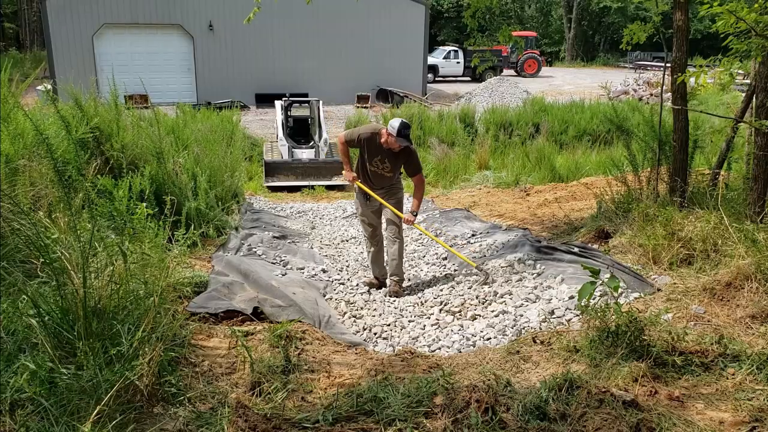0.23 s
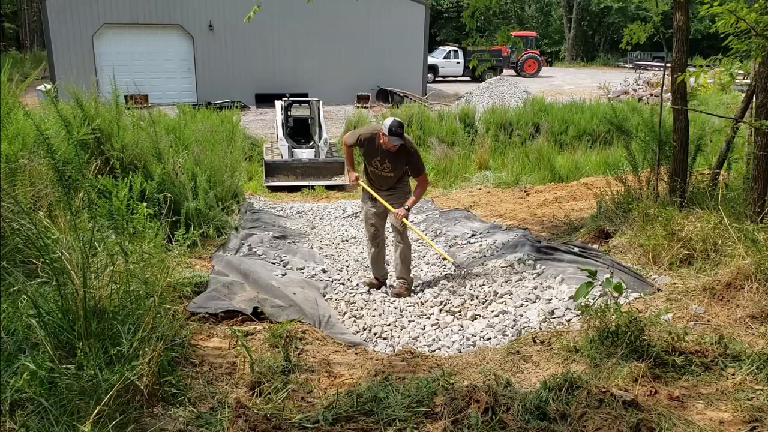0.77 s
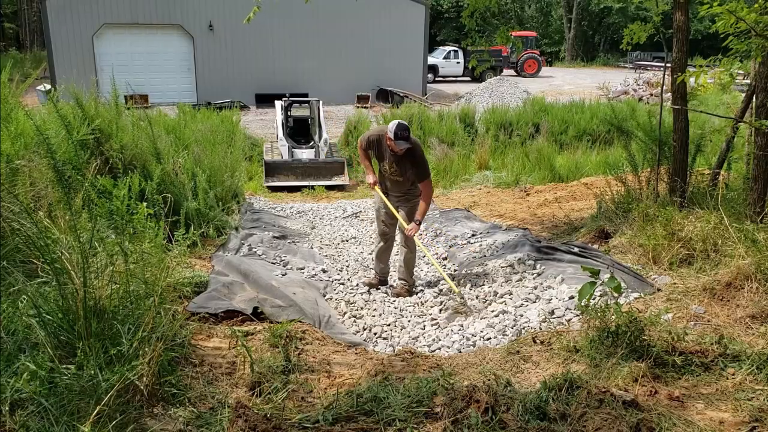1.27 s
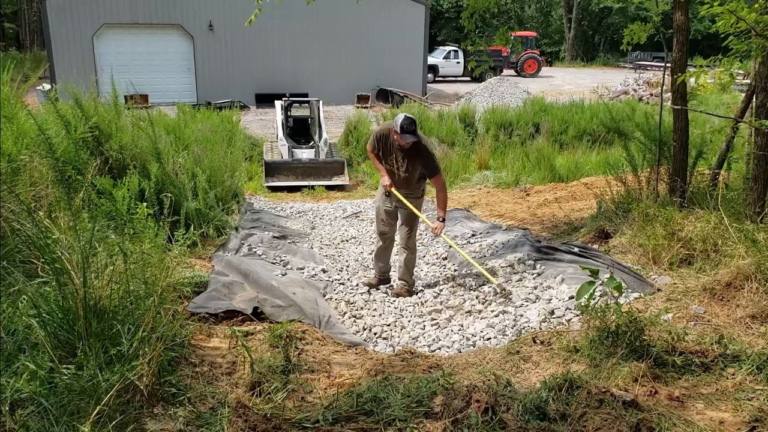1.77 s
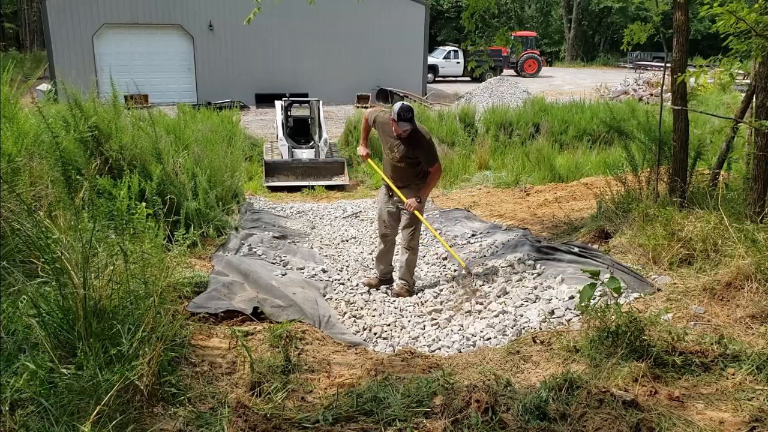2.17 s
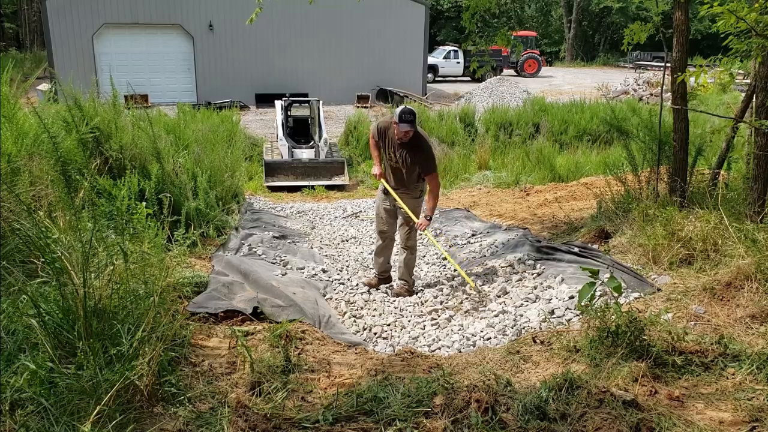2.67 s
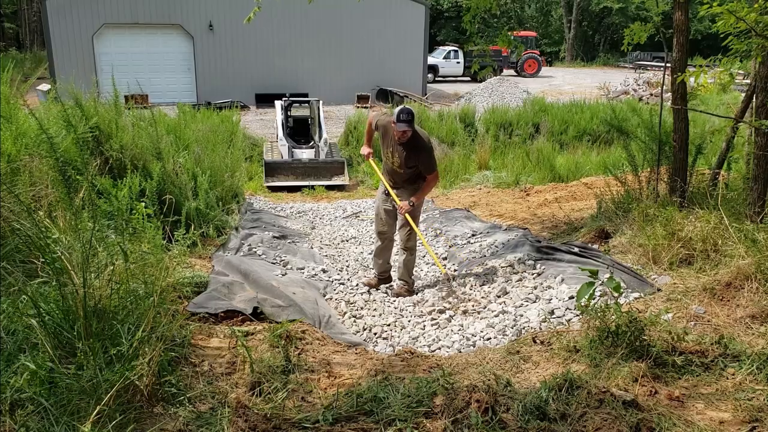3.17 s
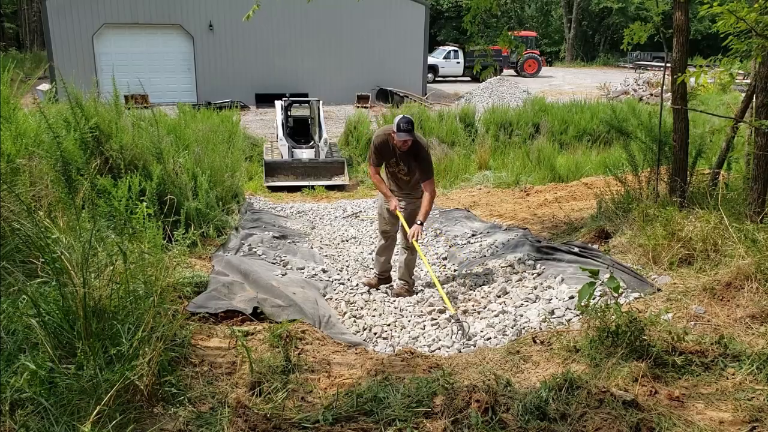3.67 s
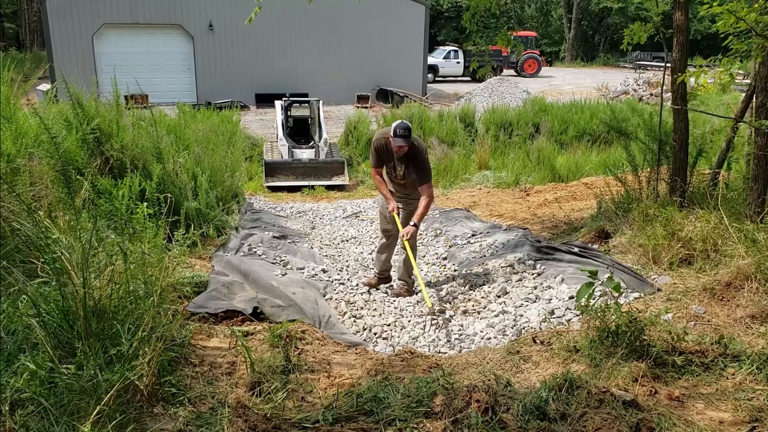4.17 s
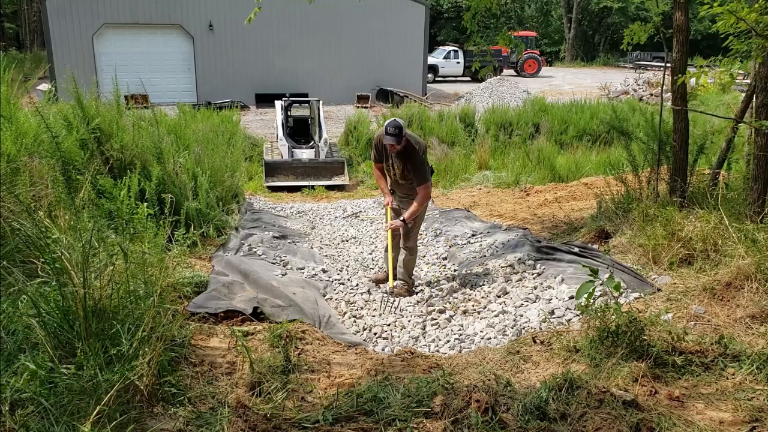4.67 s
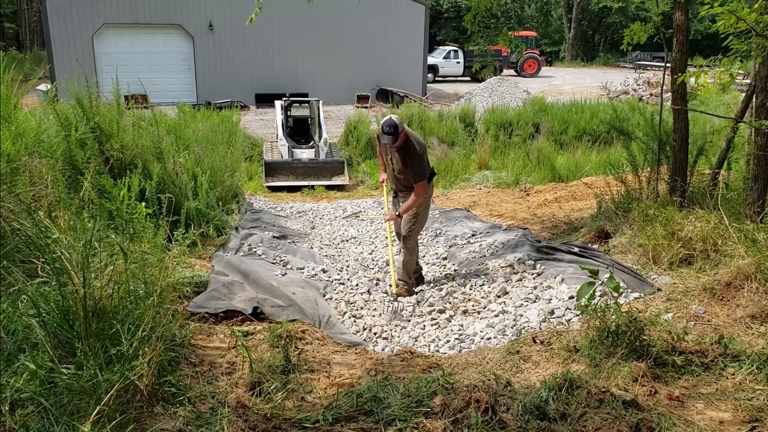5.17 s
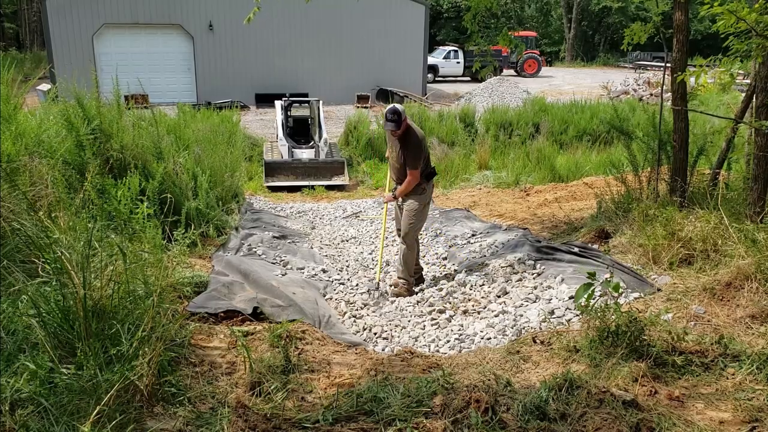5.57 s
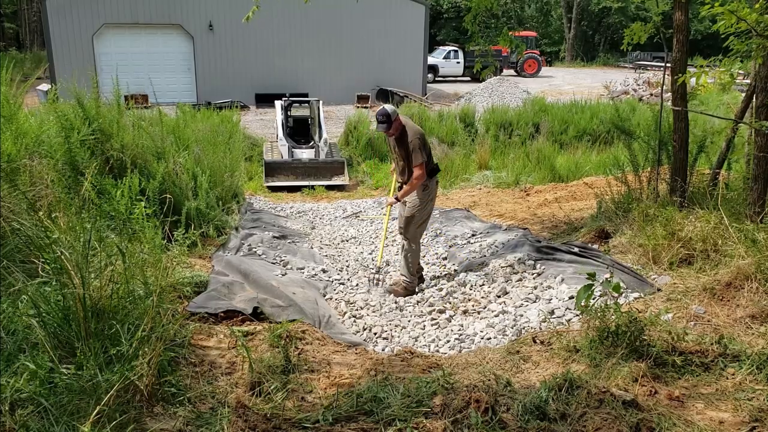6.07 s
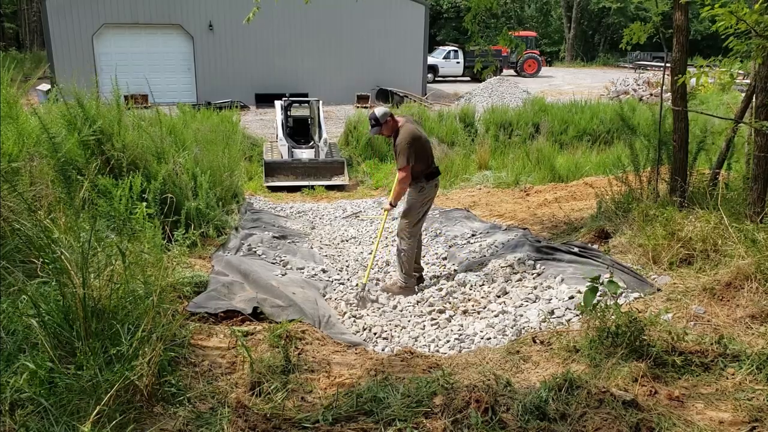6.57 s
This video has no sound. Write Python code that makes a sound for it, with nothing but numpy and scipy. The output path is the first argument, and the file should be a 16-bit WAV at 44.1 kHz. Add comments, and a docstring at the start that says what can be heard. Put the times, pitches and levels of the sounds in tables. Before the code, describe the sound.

A steel rake works coarse loose stones in an open yard, heard in stereo from several metres away. Thin insect hiss, quiet air and low breeze bumps on the microphone run throughout. Two tiny stone clicks come at 0.1 s, then a short scrape at 0.2 s with scattered clinks until 0.8. Longer gritty drags start at about 1.2, 1.8 and 2.7 s, tines skidding and ringing, stones clattering and tumbling afterwards; one sharp clack stands out near 2.5. The head chops into the heap at 3.7, 4.1 and 4.5 s: bright crunches with dull thuds, and small scrapes between. A far bird trills in rapid falling notes from 4.3 to 5.1, growing slightly. Grinding pulls resume from 5.1 to 5.7, brighter and closely spaced, then sparse clicks and shorter scrapes around 6.4 and 6.6. Trees and a shed scatter short diffuse echoes.

```python
"""Two stone clicks over insect hiss and breeze; then a steel rake is pulled through coarse loose stones. Tines
skid and ring (noisy contacts through steel modes); the bed grinds (colliding grains of damped sines). Stones
tumble during and after pulls (damped clicks); three times the head chops into the heap (noise bursts). Noise
tails scatter the sound back as from trees and a shed; a far bird trills in falling sines. Shaped noise makes
the air, the insects, the breeze that nudges the microphone and low thumps of the rake on the ground."""
import sys
import numpy as np
from scipy import signal
from scipy.fft import rfft, irfft, next_fast_len
from scipy.io import wavfile
from scipy.ndimage import map_coordinates

SR = 44100
rng = np.random.default_rng(int(sys.argv[2]) if len(sys.argv) > 2 else 0)


def inscribe(sig):
    """Save sig as 16-bit PCM at rate SR to the path in sys.argv[1].

    A 1-D sig is mono; a 2-D sig holds one channel per row.
    Samples are clipped to [-1, 1] before scaling.
    """
    pcm = np.round(np.clip(np.atleast_2d(sig).T, -1, 1) * 32767)
    wavfile.write(sys.argv[1], SR, pcm.astype(np.int16))


N = 300321

# Background air, relative density: f/Hz, level/dB
AIR_SPECTRUM = [(60, -11.5), (120, -11.5), (250, -15), (500, -18), (1000, -27.5), (2000, -28.5),
                (4000, -28.5), (8500, -38), (10000, -26.5), (11000, -27), (16000, -33)]
# Insect chorus, relative density: f/Hz, level/dB
INSECT_SPECTRUM = [(3000, -25), (4800, -7.5), (5700, -1.5), (6500, -0.5), (7500, -4.5), (8500, -21),
                   (12000, -22.5)]
# Breeze on the microphone, relative density: f/Hz, level/dB
BUFFET_SPECTRUM = [(15, -31.5), (30, -8.5), (45, -5), (60, -0.5), (90, -5), (130, -10.5), (200, -21.5),
                   (300, -34), (600, -68)]
# Low puffs of breeze and thumps of the rake on the ground, before the microphone's low cut: middle t/s, 1/e
# half-width t/s, level/dB
PUFFS = [(0.284, .05, -46), (.41, 0.094, -48.5), (0.579, 0.031, -46.5), (0.915, 0.04, -52.5),
         (1.203, .09, -49.5), (1.373, 0.011, -34.5), (1.854, 0.025, -40), (2.0, 0.13, -57.5),
         (2.284, .025, -59), (2.72, .025, -51), (3.732, 0.016, -41), (3.82, .08, -55.5),
         (4.077, 0.022, -53), (4.515, 0.013, -40.5), (4.598, 0.017, -45), (4.708, 0.049, -41),
         (5.24, 0.095, -50), (6.3, .06, -61)]
# Decay of the late scatter: f/Hz, t60/s
YARD_T60 = [(200, 1), (800, 0.53), (2500, 0.46), (6000, 0.39), (15000, 0.37)]
# Colour of the foliage's scatter: f/Hz, relative level/dB
SCATTER_SPECTRUM = [(200, -11), (900, -6.5), (1500, -7.5), (2500, -4.5), (5000, -1), (9000, 2), (12500, -1),
                    (16000, -5.5)]
# Rake comes in from the right towards the middle: t/s, lateness of the left port/samples
LEFT_LAG = [(0, 3.3), (2, 3.1), (3.7, 3.4), (4.1, 2.38), (4.5, 0.94), (6.8, 0.32)]
# Placed knocks of stone on stone, loud and faint: t/s, relative level/dB, f/Hz
STONES = [(0.074, -37.5, 3850), (0.096, -30.5, 3080), (0.505, -23.5, 3230), (0.549, -22.5, 4600),
          (0.652, -29.5, 4470), (0.699, -30.5, 4100), (0.715, -32, 2950), (0.773, -24, 4200),
          (1.517, -25.5, 1890), (1.527, -24, 2200), (1.561, -23, 3030), (1.656, -39, 2350),
          (2.097, -19.5, 2554), (2.147, -19.5, 2666), (2.34, -24.5, 3000), (2.351, -19.5, 3256),
          (2.384, -29.5, 2840), (2.413, -29, 3970), (2.422, -17, 4090), (2.452, -19, 4490),
          (2.463, -7, 4290), (2.928, -26, 2360), (2.977, -23.5, 2370), (3.012, -27, 2300),
          (3.036, -18.5, 3670), (3.055, -21.5, 2600), (3.115, -24.5, 3300), (3.13, -23.5, 2920),
          (3.156, -16.5, 4650), (3.169, -18.5, 3400), (3.208, -21.5, 3470), (3.275, -21.5, 3730),
          (3.317, -30, 3100), (3.451, -42, 6000), (5.406, -14.5, 7840), (5.81, -26, 3540),
          (5.87, -26, 3900), (5.91, -22.5, 4300), (5.994, -35, 3560), (6.046, -32.5, 6280),
          (6.118, -30, 2630), (6.259, -35, 4460), (6.305, -28, 5000), (6.328, -37, 3220),
          (6.346, -39, 2930), (6.573, -22, 4930), (6.659, -23.5, 4940), (6.767, -17.5, 4850)]
# Head touches or bites into the heap: t/s, attack time constant t/s, relative crunch level/dB,
# relative thud level/dB, crunch t60/s, knock f/Hz, after-ring f/Hz
CHOPS = [(3.708, .0003, -29.5, -55, .03, 1300, 2420), (3.714, .0003, -15.5, -25.5, 0.17, 1316, 2360),
         (4.076, .0003, -34, -58, 0.039, 950, 2430), (4.087, 0.00043, -25, -45, 0.072, 1100, 2410),
         (4.0945, .0003, -23.5, -39.5, .13, 965, 2490), (4.4916, 0.0014, -25.5, -36, 0.18, 502, 2800)]
# Crunch of the heap, relative density: f/Hz, level/dB
HEAP_SPECTRUM = [(290, -50), (500, -5), (919, -5), (1080, -20), (1230, -9.5), (2010, 0.5), (2360, -5),
                 (2540, 2), (2770, 4.5), (6140, 4), (7210, 4.5), (14200, 5), (15100, 8.5), (16000, -20)]
# Thud of the struck heap: f/Hz, relative level/dB
THUD_SPECTRUM = [(100, -4), (200, -10.5), (270, -9.5), (380, -11.5), (500, -10.5), (650, -12.5), (900, 0.5),
                 (1080, -7), (1300, -4), (1700, -8), (3000, -11), (8000, -58)]
# Tine catches and slips off, or a stone ticks against a tine: t/s, head skid time constant t/s,
# relative head level/dB, head f/Hz, relative tine level/dB, tine f/Hz
CATCHES = [(0.211, .004, -24.5, 3000, -36.5, 11000), (0.2688, 0.0068, -23, 3230, -36.5, 11000),
           (0.4211, 0.0023, -32.5, 2820, -39, 11080), (1.168, 0.0068, -24.5, 2670, -34, 10500),
           (1.1842, 0.0029, -16.5, 1370, -41, 11000), (1.198, 0.0042, -23, 1460, -30.5, 10600),
           (1.2228, 0.0041, -21, 1608, -40, 15640), (1.239, 0.0029, -17.5, 1600, -40.5, 7800),
           (1.2729, .003, -14, 1690, -31, 11000), (1.3697, 0.0037, -28, 1540, -33, 11000),
           (1.391, 0.0025, -22, 1660, -52, 11200), (1.4367, 0.0021, -22, 1480, -44.5, 7850),
           (1.4556, 0.0024, -24.5, 1670, -42.5, 7800), (1.8238, 0.0018, -32.5, 3460, -33.5, 8170),
           (1.838, 0.0032, -15, 2270, -34.5, 8170), (1.881, 0.0028, -15, 2200, -37.5, 7700),
           (1.8977, 0.0052, -19, 2220, -43, 7780), (1.9223, .0045, -12, 2760, -27, 7400),
           (1.9667, 0.0025, -20, 2190, -55, 7290), (2.001, 0.0052, -14.5, 2400, -27.5, 8900),
           (2.0254, 0.0018, -17, 2970, -47, 11300), (2.0734, 0.0026, -27, 3040, -32.5, 10800),
           (2.086, 0.0034, -15.5, 3105, -37, 11100), (2.166, 0.0036, -17.5, 2640, -40, 7840),
           (2.2174, 0.0021, -24, 3440, -66, 8360), (2.353, 0.00088, -47, 2000, -48.5, 12420),
           (2.6977, 0.0029, -16, 2260, -26.5, 11200), (2.7291, 0.0023, -16, 2370, -34.5, 10050),
           (2.7631, .004, -14.5, 2920, -27.5, 13000), (2.7757, 0.0036, -19, 2300, -35.5, 7190),
           (2.849, 0.0052, -21.5, 3040, -48, 7950), (2.882, 0.0042, -15, 3170, -34, 10400),
           (3.021, 0.0025, -31, 3550, -42.5, 15300), (3.0684, 0.0027, -22, 2620, -42, 15500),
           (3.202, 0.0012, -43.5, 1960, -48, 13900), (5.3391, 0.0041, -21, 1260, -40.5, 7120),
           (5.351, 0.0032, -27, 3200, -36.5, 10100), (5.4586, 0.0028, -22.5, 3260, -37, 7750),
           (5.5672, 0.0028, -23.5, 1350, -42.5, 8700), (5.6474, 0.0026, -17, 1630, -34, 7540),
           (6.3847, .0033, -31, 1430, -39, 8070), (6.408, .003, -32, 1420, -36, 12400),
           (6.621, 0.0047, -38, 1380, -46.5, 7040)]
# Modes of the rake's head and tines: f/Hz, width f/Hz, relative level/dB
RAKE_MODES = [(960, 51, 6.5), (1551, 100, 2), (1880, 84, -9), (2284, 57, -8.5), (2647, 69, -10),
              (2960, 90, -3.5), (2950, 80, -9), (3520, 70, -5), (5470, 110, -15), (6250, 120, -14.5),
              (7570, 130, -2), (8000, 150, -3), (10100, 110, -8), (10860, 90, -13.5), (11190, 39, 6.5),
              (11650, 120, -3.5), (13400, 73, -12), (16200, 110, -11.5)]
# Stony contact: f/Hz, relative level/dB
GRAVEL_SPECTRUM = [(200, -12), (400, -13.5), (700, -13), (1150, -4.5), (1500, 0), (3000, 4.5), (4500, 6),
                   (7000, 1.5), (9000, -4), (12000, -2), (16000, 1)]
# Deep shifting stones: f/Hz, relative level/dB
BED_SPECTRUM = [(100, -35), (250, -9), (450, -14.5), (600, -7), (780, 3), (950, 3.5), (1100, -10),
                (1300, 4.5), (1800, -20.5), (4000, -52.5)]
# One drag, or a slide of stones after it: start t/s, attack t/s, hold t/s, sag over the hold/dB,
# stone fade/(dB/s), relative stone, grit and bed levels/dB, stone f/Hz
PULLS = [(0.204, .004, 0.34, 4.5, 277, -41, -42.5, -53.5, 2870),
         (0.64, .04, .09, -4.5, 203, -60, -67, -82, 3000),
         (1.165, .004, 0.34, 5, 160, -38, -43.5, -49.5, 1693),
         (1.828, .004, 0.38, 6, 127, -35, -39, -48, 2424),
         (2.693, .004, 0.36, 3, 100, -37.5, -43.5, -51.5, 2660),
         (3.8, 0.011, 0.17, 4, 397, -51, -47.5, -64, 2700), (4.015, .004, .05, 4, 403, -70, -43, -85, 3000),
         (4.589, .03, .01, 0.5, 130, -58.5, -59, -76, 2690),
         (5.107, .003, 0.078, 1, 330, -36.5, -36, -43.5, 2564),
         (5.274, 0.065, .12, 5, 142, -33.5, -34.5, -44.5, 2240),
         (5.508, .08, 0.12, 0.5, 86, -33, -35, -45, 1825),
         (5.854, 0.017, 0.071, 11, 95, -59, -49.5, -80, 3336),
         (6.113, .015, .06, -3, 62, -64.5, -81, -80.5, 2694), (6.3, .01, .04, 11, 300, -70, -54, -59, 2400),
         (6.354, 0.02, .04, 1.5, 300, -37, -40.5, -46, 2400),
         (6.609, .06, 0.11, 1, 198, -44.5, -44, -56.5, 2550)]

TOP_HZ = 15800
INSECT_DB, SWELL_DB, SWELL_S, SWELL_HALF_S = -69, 3, 4.54, 0.46  # one slow swell, 1/e half-width
BREEZE_DB, BREEZE_SWING_DB = -65, 1.5  # light draught between the puffs, before the low cut
# Lesser stones kicked loose: level over the pull's stones, scatter, run-on after the hold, fade
TUMBLE_DB, TUMBLE_SPREAD_DB, TUMBLE_RUN_S, TUMBLE_FADE_DB_PER_S = 7.5, 1, 0.34, 44
AFTER_RING_DB, AFTER_RING_T60_S = -31, 0.62  # rake's after-ring, relative to the chop
# Handle jolt: base level, share of the blow's dB followed, gain with stone pitch over 2 kHz
JOLT_DB, JOLT_SHARE, JOLT_DB_PER_OCTAVE = -50.5, 0.35, 5
SETTLE_S, SETTLE_HZ = 0.096, 3080  # after the hold, only the smaller stones keep moving
GRIT_FADE, BED_FADE = 1.05, 1.08  # fade rates relative to the stones


def amp(db):
    """Decibels to gain."""
    return 10 ** (np.asarray(db) / 20)


def unit(x):
    """Scale to rms 1."""
    return x / np.sqrt(np.mean(x ** 2) + 1e-20)


def early_unit(x):
    """Scale to rms 1 over the first 20 ms."""
    return x / np.sqrt(np.mean(x[:SR // 50] ** 2) + 1e-20)


def along(points, hz):
    """Interpolate (Hz, value) points on a log frequency axis."""
    f, v = np.transpose(points)
    return np.interp(np.log(hz + 1), np.log(f + 1), v)


def wobble(rate_hz):
    """Smooth random curve with rate_hz knots a second."""
    knots = rng.standard_normal(int(N * rate_hz / SR) + 4)
    return map_coordinates(knots, [np.arange(N) * rate_hz / SR])


def filtered(x, response):
    """Apply a complex response of frequency."""
    n = x.shape[-1]
    m = next_fast_len(n + n // 8, True)
    return irfft(rfft(x, m) * response(np.fft.rfftfreq(m, 1 / SR)), m)[..., :n]


def band(x, lo_hz, hi_hz, order=2):
    """Causal band-pass."""
    edges_hz = [lo_hz, min(hi_hz, SR / 2 - 100)]
    return signal.sosfilt(signal.butter(order, edges_hz, "band", fs=SR, output="sos"), x)


def add(track, start_s, x):
    """Mix x into the track at start_s."""
    part = track[max(0, round(start_s * SR)):][:len(x)]
    part += x[:len(part)]


def noise(spectrum, channels=2):
    """Unrelated coloured noises, overall rms 1."""
    return unit(filtered(rng.standard_normal((channels, N)), lambda hz: amp(along(spectrum, hz))))


def contacts(n, rate_hz):
    """Tiny impacts of random size, on average rate_hz a second."""
    return (rng.random(n) < rate_hz / SR) * rng.standard_normal(n)


def resonance(hz, centre_hz, width_hz):
    """Causal response of one damped mode, 1 at its centre."""
    return 1j * hz * width_hz / (centre_hz ** 2 - hz ** 2 + 1j * hz * width_hz)


def outdoors():
    """Still summer air, an insect chorus, and low puffs of breeze and thumps from the ground on the two ports,
    all as shaped noise."""
    t = np.arange(N) / SR
    air = amp(-75.0) * noise(AIR_SPECTRUM, channels=1) + amp(-71) * noise(AIR_SPECTRUM)
    swell_db = SWELL_DB * np.exp(-((t - SWELL_S) / SWELL_HALF_S) ** 2)
    insects = amp(INSECT_DB + swell_db + 0.45 * wobble(12)) * noise(INSECT_SPECTRUM)
    eddies = 2 * band(noise(BUFFET_SPECTRUM), 30, 110)  # lowest eddies differ between ports
    common = 1.9 * noise(BUFFET_SPECTRUM, channels=1)
    draught = amp(BREEZE_DB + BREEZE_SWING_DB * wobble(10))
    puffs = sum(amp(db) * np.exp(-((t - s) / half_s) ** 2) for s, half_s, db in PUFFS)
    buffet = band((draught + puffs) * unit(eddies + common), 26, 2000)  # microphone's low cut
    return air + insects + buffet * amp([[-1], [1]])


def bird(start_s=4.31, end_s=5.15, gap_s=.047):
    """A far trill of quick falling sine notes that grows louder."""
    out, u = np.zeros(N), np.linspace(0, 1, SR // 40)
    hz = np.interp(u, [0, 1], [7000, 4700])
    note = np.sin(np.pi * u) * np.sin(2 * np.pi * np.cumsum(hz) / SR)
    for s in np.arange(start_s, end_s, gap_s):
        db = np.interp(s, [start_s, end_s], [-69, -60])
        add(out, s, amp(db) * note)
    return out


def yard(x, near_db=-7, near_t60_s=0.022, far_db=-6, count=14):
    """Ground and brush scatter at once, trees and shed later: noise tails, redrawn for each of count parts."""
    out = np.zeros((2, N + SR))
    for part in np.array_split(np.arange(N), count):
        hz, t, z = signal.stft(rng.standard_normal((2, SR * 2 // 3)), SR, nperseg=256)
        z = z * amp(along(SCATTER_SPECTRUM, hz))[:, None]
        far_decay = amp(-60 * t / along(YARD_T60, hz)[:, None]) * (1 - np.exp(-t / 0.0027))
        far = signal.istft(z * far_decay, SR, nperseg=256)[1]
        near = signal.istft(z * amp(-60 * t / near_t60_s), SR, nperseg=256)[1][::-1]  # ports swapped
        far_tail = amp(far_db) * far / np.linalg.norm(far[0])
        near_tail = amp(near_db) * near / np.linalg.norm(near[0])
        wet = signal.fftconvolve(x[part][None], far_tail + near_tail, axes=1)
        out[:, part[0]:part[0] + wet.shape[1]] += wet
    return out[:, :N]


def placed(x):
    """Sound from the right reaches the left port a little late."""
    lag_s, lag = np.transpose(LEFT_LAG)
    half = np.interp(np.arange(N) / SR, lag_s, lag) / 2
    return np.array([map_coordinates(x, [np.arange(N) + d], order=5) for d in (-half, half)])


def knock(hz, cycles=0.71, rattle_db=-29, rattle_t60_s=0.029, snap_db=-19):
    """A tumbling stone gives a click of a cycle or two, then rattles as it settles."""
    t = np.arange(SR // 16) / SR
    click = np.sin(2 * np.pi * hz * t) * np.exp(-t * hz / cycles)
    snap = amp(snap_db - 60 * t / 0.0012) * rng.standard_normal(len(t))
    rattle = unit(band(contacts(len(t), rate_hz=1900), hz * 0.89, hz * 0.91))
    rattle = rattle * amp(rattle_db - 60 * t / rattle_t60_s)
    return band(click + snap + rattle, hz * 0.52, hz * 2.8, order=3)  # small stones radiate no bass


def stones(pitch_spread=.28, count=9):
    """Placed knocks, and count more at random during and just after each pull."""
    out = np.zeros(N)
    for s, db, hz in STONES:
        add(out, s + 0.00078, amp(db + 4.5) * knock(hz))
    for start, attack, hold, sag_db, _, stones_db, *_ in PULLS:
        for when, size, pitch in zip(rng.random(count), *rng.standard_normal((2, count))):
            age = when * (hold + min(hold, TUMBLE_RUN_S))
            fade_db = sag_db * when + TUMBLE_FADE_DB_PER_S * max(age - hold, 0)
            db = stones_db + TUMBLE_DB + TUMBLE_SPREAD_DB * size - fade_db
            hz = SETTLE_HZ * np.exp(pitch_spread * np.clip(pitch, -2, 2))
            add(out, start + attack + age, amp(db) * knock(hz))
    return out


def steel(hz, gains_db=0):
    """The rake's resonances, each with an extra gain."""
    centre, width, db = np.transpose(RAKE_MODES)
    return sum(g * resonance(hz, c, w) for c, w, g in zip(centre, width, amp(db + gains_db)))


def on_rake(x, stone_db, gains_db=0):
    """Contacts are heard directly as stone and through the ringing steel."""
    return filtered(x, lambda hz: amp(stone_db + along(GRAVEL_SPECTRUM, hz)) + steel(hz, gains_db))


def chops():
    """All tines bite at once: a dense bright crunch, a thud swelling as the heap gives way, a faint ring."""
    out, t = np.zeros(N), np.arange(SR // 2) / SR
    crunch_body = lambda hz: amp(along(HEAP_SPECTRUM, hz)) * (1 + amp(-11) * steel(hz))
    for s, attack, db, thud_db, t60, knock_hz, ring_hz in CHOPS:
        crunch = filtered(contacts(len(t), rate_hz=9000), crunch_body)
        knock_mode = lambda hz: 1 + amp(-3.0) * resonance(hz, knock_hz, 0.18 * knock_hz)
        thud_body = lambda hz: amp(along(THUD_SPECTRUM, hz)) * knock_mode(hz)
        thud = filtered(contacts(len(t), rate_hz=10000), thud_body)
        ring = unit(band(rng.standard_normal(len(t)), ring_hz - 160, ring_hz + 160))
        add(out, s, amp(db - 3 - 60 * t / t60) * (1 - np.exp(-t / attack)) * unit(crunch))
        add(out, s, amp(thud_db + 4.0 - 60 * t / 0.12) * (1 - np.exp(-t / 0.011)) * unit(thud))
        add(out, s, amp(db + AFTER_RING_DB - 60 * t / AFTER_RING_T60_S) * ring)  # rake rings on
    return out


def catches(scratch_share=0.67, favour_db=2, favour_width=.05, head_db=-13.5, tine_db=1, stone_width=0.2):
    """Tine and stone meet for milliseconds; the stone's ring colours the blow and favours nearby modes."""
    out, t = np.zeros(N), np.arange(SR // 8) / SR
    mode_hz = np.transpose(RAKE_MODES)[0]
    skid = lambda span_s: t / span_s * np.exp(-t / span_s) * contacts(len(t), rate_hz=9000)
    for s, skid_s, db, head_hz, ring_db, tine_hz in CATCHES:
        near = sum(np.exp(-(np.log(mode_hz / hz) / favour_width) ** 2) for hz in (head_hz, tine_hz))
        gains_db = favour_db * near + 1.1 * rng.standard_normal(len(RAKE_MODES))

        neighbours_hz = rng.uniform(1300, 3400, size=2)  # stones that it is shoved against
        neighbours = lambda hz: sum(resonance(hz, f, 160) for f in neighbours_hz)
        stone = lambda hz: resonance(hz, head_hz, stone_width * head_hz) + amp(-8.5) * neighbours(hz)
        head = on_rake(skid(skid_s), stone_db=-4, gains_db=gains_db)
        head = filtered(head, lambda hz: amp(-18) + stone(hz))
        head = early_unit(band(head, 450, 3900, order=4))

        tine = on_rake(skid(scratch_share * skid_s), stone_db=-2.0, gains_db=gains_db)
        tine = filtered(tine, lambda hz: amp(-1.0) + resonance(hz, tine_hz, 900))
        tine = early_unit(band(tine, 5500, 17000))

        jolt = early_unit(band(skid(2.63 * skid_s), 170, 720))  # handle takes the jerk
        jolt_db = JOLT_DB + JOLT_SHARE * db + JOLT_DB_PER_OCTAVE * np.log2(head_hz / 2000)
        add(out, s, amp(db + head_db) * head + amp(jolt_db) * jolt)
        add(out, s - .001, amp(ring_db + tine_db) * tine)
    return out


def grains(centre_hz, spread, cycles, size_db, count, size=160):
    """Colliding pebbles: short damped sines scattered around a fixed or moving pitch."""
    t = np.arange(size) / SR
    start, sign, strength = rng.random((3, count))
    start = (start * N).astype(int)
    hz = np.broadcast_to(centre_hz, N)[start] * np.exp(spread * rng.standard_normal(count))
    hz = hz[:, None]
    loudness_db = -size_db * np.log(np.maximum(strength, np.exp(-4)))  # few large, many small
    gain = np.sign(sign - .5) * amp(loudness_db)
    waves = gain[:, None] * np.sqrt(hz) * np.exp(-t * hz / cycles) * np.sin(2 * np.pi * hz * t)
    places = start[:, None] + np.arange(size)
    return unit(np.bincount(places.ravel(), waves.ravel(), N)[:N])


def drag():
    """Each pull bites, sags while held and dies away: gains of stones, grit and bed, and the stones' pitch."""
    t = np.arange(N) / SR
    gains, pitch_hz = np.zeros((3, N)), np.full(N, float(SETTLE_HZ))
    for start, attack, hold, sag_db, fade, stones_db, grit_db, bed_db, hz in PULLS:
        now = slice(round(start * SR), round(start * SR) + SR)
        age = t[now] - start
        after = np.maximum(age - attack - hold, 0)
        held = np.clip(age / attack, 0, 1) * amp(-sag_db * np.clip((age - attack) / hold, 0, 1))
        stones_now_db = stones_db - fade * after
        grit_now_db = grit_db - GRIT_FADE * fade * after
        bed_now_db = bed_db - BED_FADE * fade * after
        gains[:, now] += held * amp([stones_now_db, grit_now_db, bed_now_db])
        pitch_hz[now] = hz + (SETTLE_HZ - hz) * np.minimum(after / SETTLE_S, 1)
    return *gains, pitch_hz


def pulls():
    """The dragged head keeps cobbles, pebbles, grit and the bed beneath colliding, in uneven surges."""
    stone_gain, grit_gain, bed_gain, pitch_hz = drag()
    surge = amp(1.9 * wobble(80))
    cobbles = grains(pitch_hz, spread=.2, cycles=5, size_db=3, count=2400, size=500)
    pebbles = grains(2900, spread=0.46, cycles=0.98, size_db=3.0, count=9000)
    clatter = on_rake(cobbles + amp(1) * pebbles, stone_db=-1.5)
    clatter = unit(band(clatter, 1000, 7000, order=3))
    grit = grains(9000, spread=.4, cycles=1.2, size_db=3.4, count=32000, size=40)
    grind = unit(band(on_rake(grit, stone_db=5), 5200, 18000))
    shift = unit(filtered(contacts(N, rate_hz=1500), lambda hz: amp(along(BED_SPECTRUM, hz))))
    bed = amp(-3.5) * bed_gain * shift
    return surge * (amp(-3.5) * stone_gain * clatter + amp(-4) * grit_gain * grind + bed)


def scene():
    """The raking, its echoes in the open yard, the bird and the outdoor background."""
    raking = pulls() + catches() + chops() + stones()
    trill = bird()
    in_yard = placed(raking) + yard(raking + trill)
    return in_yard * amp([[-.4], [.4]]) + trill + outdoors()


def record(dry):
    """Steep low-pass at TOP_HZ."""
    return filtered(dry, lambda hz: 1 / (1 + (hz / TOP_HZ) ** 240))


dry = scene()
out = record(dry)
inscribe(out)
```